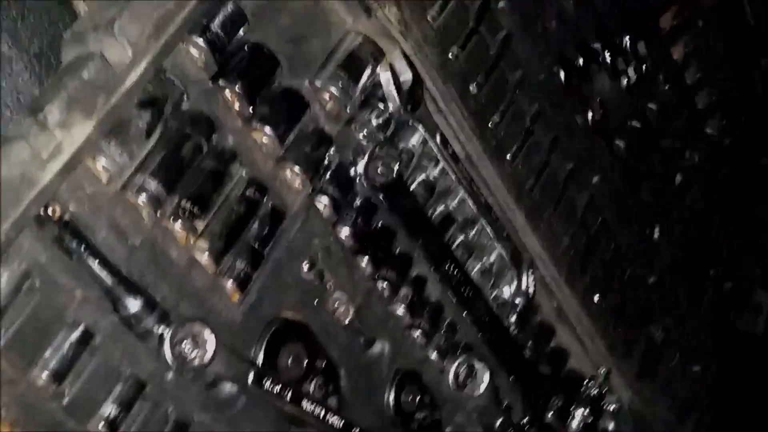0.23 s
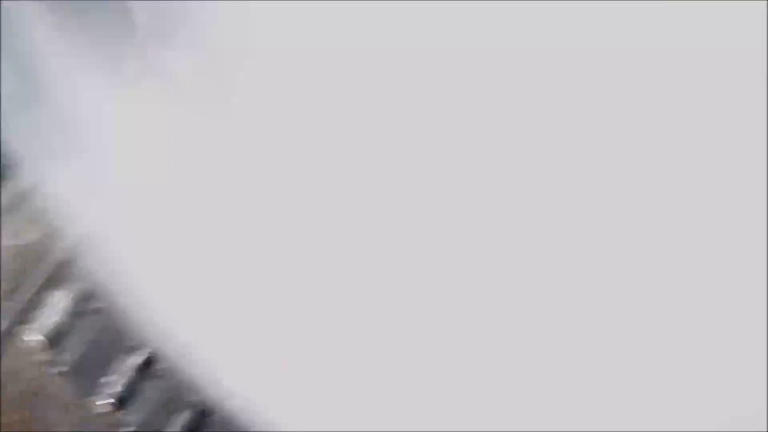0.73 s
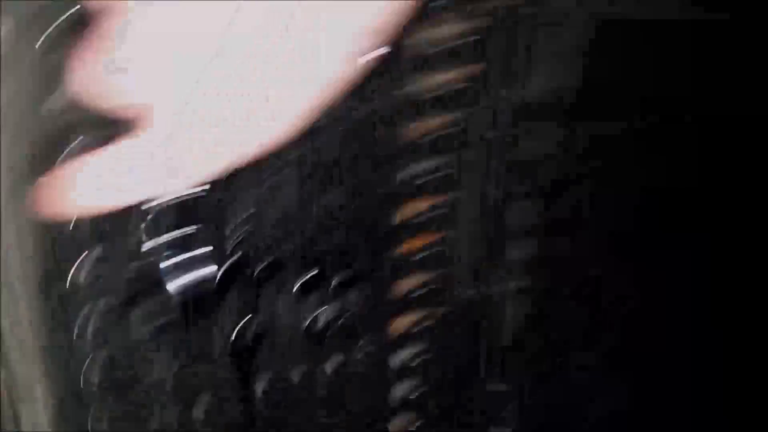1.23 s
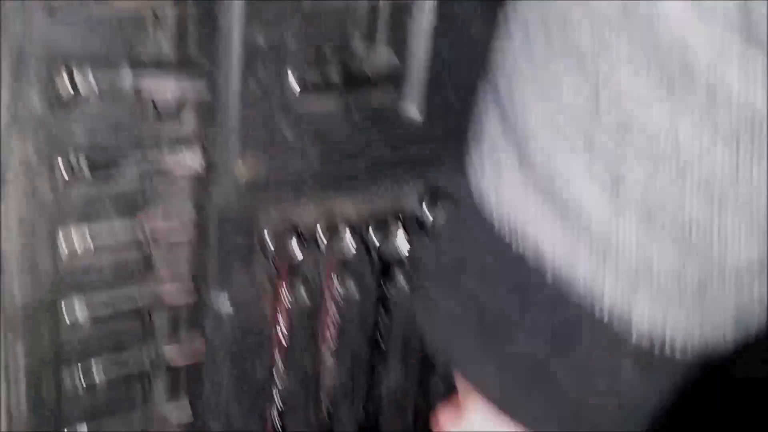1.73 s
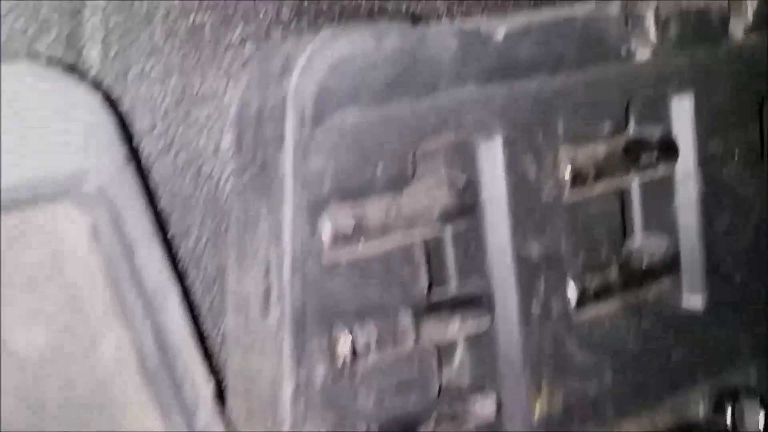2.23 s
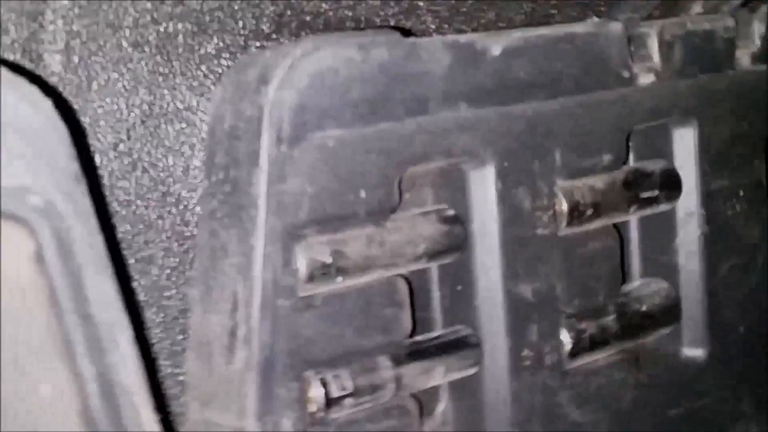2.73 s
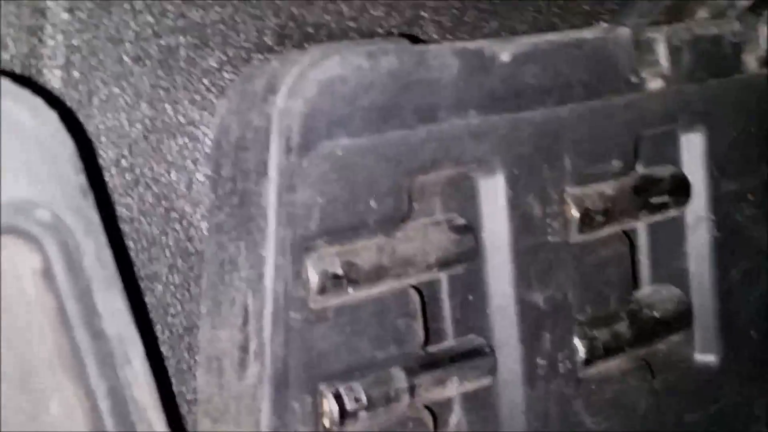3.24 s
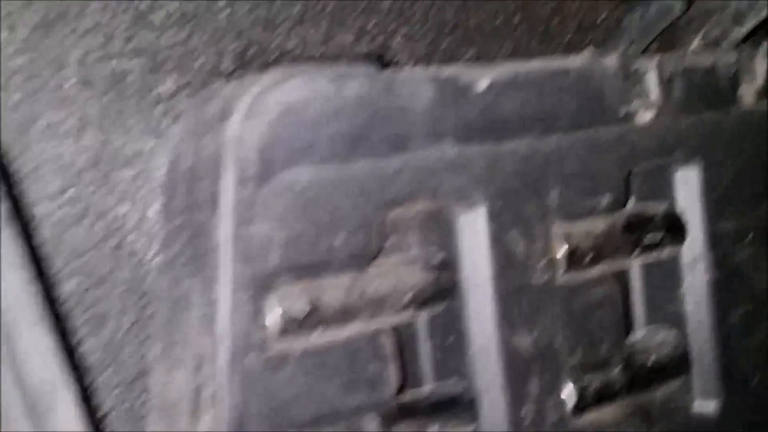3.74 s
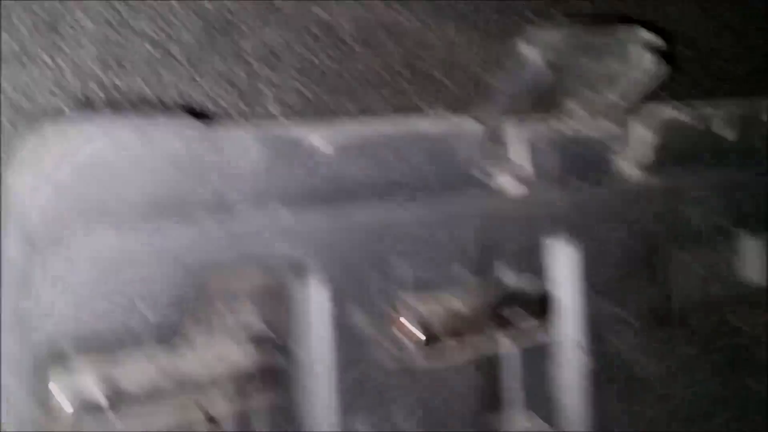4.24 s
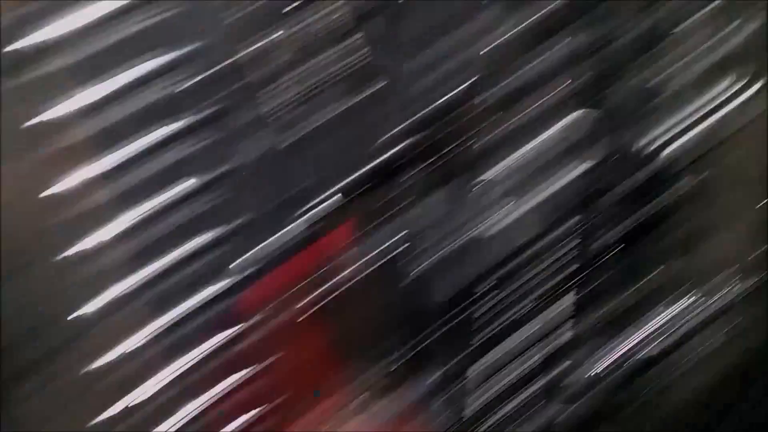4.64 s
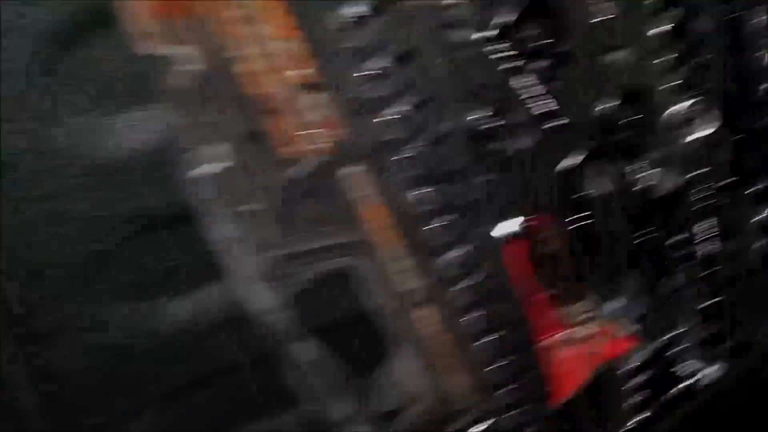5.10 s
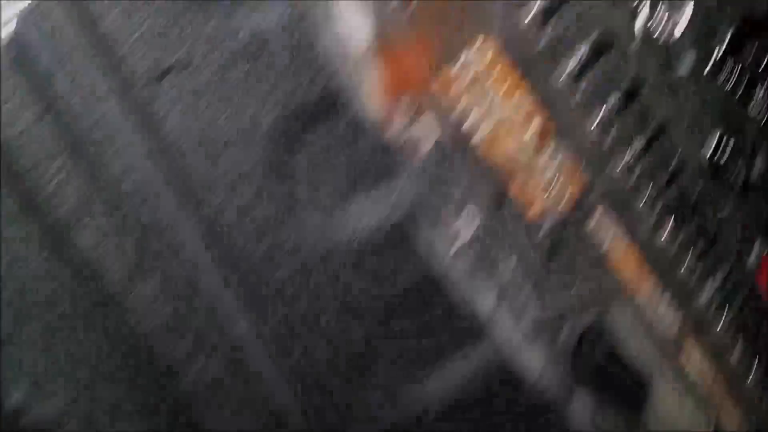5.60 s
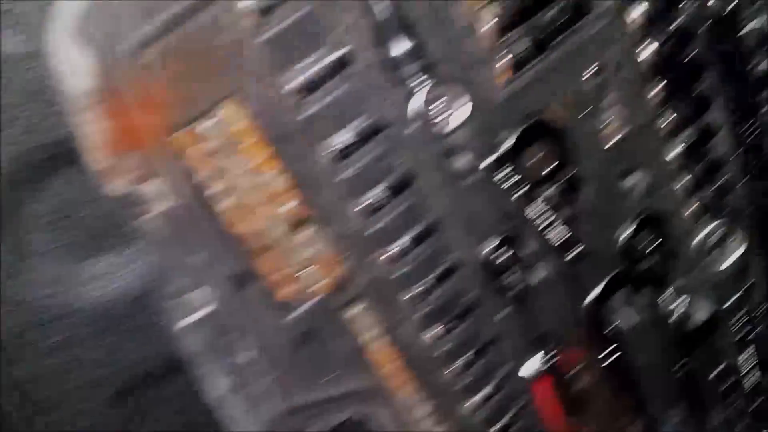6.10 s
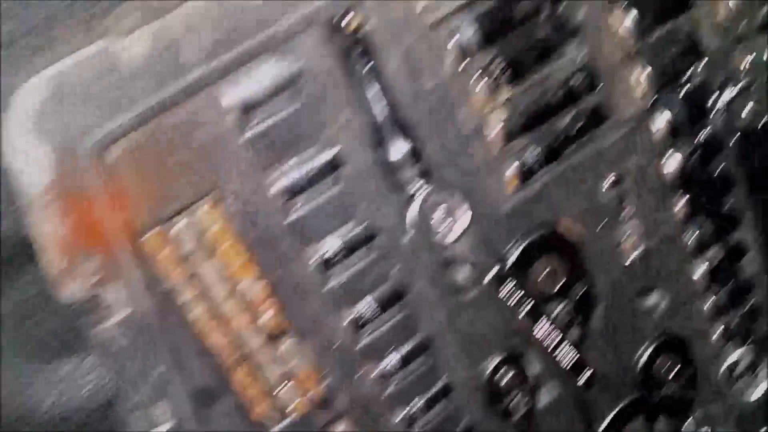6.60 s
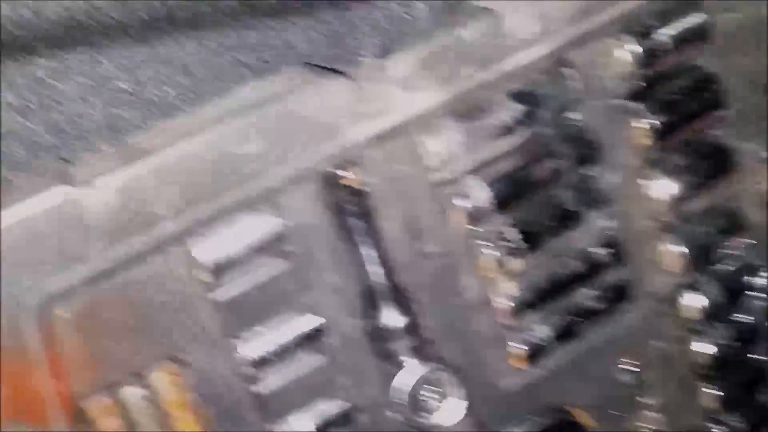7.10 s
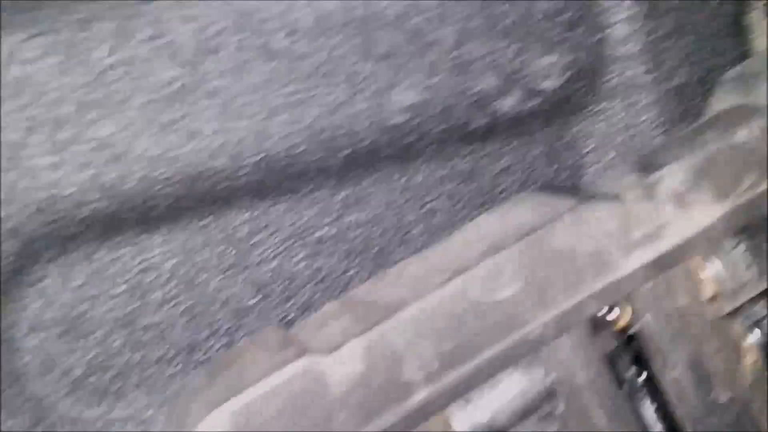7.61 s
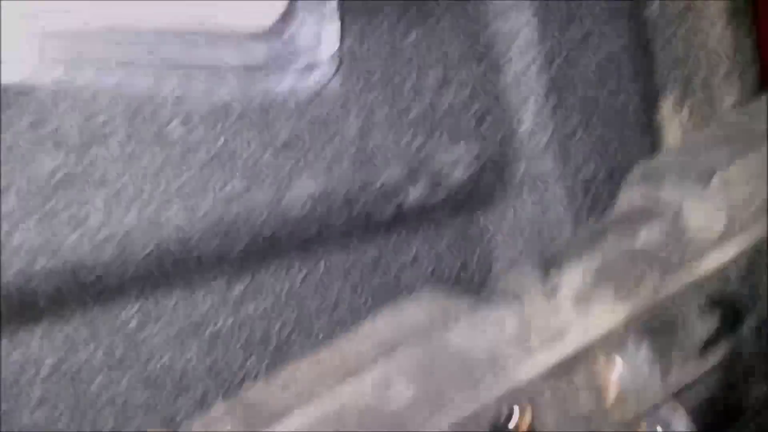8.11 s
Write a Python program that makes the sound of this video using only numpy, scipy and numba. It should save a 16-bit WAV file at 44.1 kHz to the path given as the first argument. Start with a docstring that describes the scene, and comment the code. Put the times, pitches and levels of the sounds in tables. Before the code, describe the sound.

A plastic tool case holding steel sockets is handled close to the microphone in a garage, with a short echo and a faint distant rumble. After a nearly quiet start, hollow knocks and socket rattles begin at 1.4 seconds, loudest around 1.9 and 2. From about 2.5 to 4.5 seconds the case drags over the floor in uneven shoves, a low, rough scrape with small bumps and chatter; faint plastic squeaks sound until 3 seconds. A loud, sharp knock rattles the sockets at 4.5. Quieter shifting follows, with a single thud at 5.8. Two knocks near 6.8 lead to a heavy thump and metal clink at 7, then a smaller bump. Around 7.9 come several quick knocks, bright clinks and a short scrape that fades away. A faint hiss swells after the louder sounds.

```python
"""A garage, a handheld phone close to a moulded plastic tool case full of steel sockets.
The case is tipped, dragged and dropped: blows and stick-slip on the floor ring its hollow shell,
the loose sockets chatter and clink, and plastic squeaks on plastic. Behind it are a low distant rumble
and a short tail off the walls. The phone's noise gate lets its hiss through only after loud sound."""
import sys
import numpy as np
from scipy import signal
from scipy.fft import rfft, irfft
from scipy.io import wavfile
from scipy.ndimage import uniform_filter1d
from numba import njit

SR = 44100
rng = np.random.default_rng(int(sys.argv[2]) if len(sys.argv) > 2 else 0)


def generate_wav(signal):
    """Clip the signal to [-1, 1] and save it as 16-bit WAV at the path in sys.argv[1]."""
    frames = np.transpose(np.atleast_2d(signal))
    scaled = np.clip(frames, -1, 1) * 32767
    pcm = np.round(scaled).astype(np.int16)
    wavfile.write(sys.argv[1], SR, pcm)


N = 368235
T = np.arange(N) / SR

# Distant rumble and air: (frequency [Hz], relative density [dB])
AMBIENCE_SPECTRUM = [(12, -29.5), (20, 2), (27, -7.5), (95, -3.5), (148, -19.5), (306, -21), (534, -25),
                     (1070, -23.5), (1540, -47.5), (5690, -46), (15500, -46.5)]
# Decay off the walls: (frequency [Hz], t60 [s])
WALL_DECAY = [(150, 0.51), (600, 0.16), (2000, 0.093), (6000, 0.12)]
# Microphone hiss: (frequency [Hz], relative density [dB])
HISS_SPECTRUM = [(800, -27), (3000, -9.5), (5000, -15), (9000, -17), (12000, -5.5), (14500, 0.5),
                 (16000, -7)]
# Plastic rubbing plastic: (start [s], length [s], first pitch [Hz], last pitch [Hz], blur [Hz],
# level [dB], octave above it, relative level [dB])
SQUEAK_GLIDES = [(1.045, 0.41, 2592, 2540, 250, -86.5, -34), (1.444, .8, 2630, 2556, 250, -68.5, -28),
                 (2.426, 0.095, 2550, 2470, 156, -67, -4), (2.549, 0.026, 2110, 2710, 38.6, -64, 13.5),
                 (2.676, 0.022, 2280, 2580, 40.6, -64, 16), (2.69, .09, 2560, 2450, 220, -58.5, -7),
                 (2.829, 0.071, 2500, 2450, 217, -59, -9), (2.921, 0.12, 2460, 2290, 200, -63, -4),
                 (2.581, .3, 3480, 2745, 906, -62.5, -29), (7.592, 0.29, 3890, 3850, 160, -75.5, -38)]
# The case shifting in the hands throughout: (time [s], rumble [dB], brightness [dB])
HAND_SHIFTS = [(0.0, -95.5, 0), (0.3, -82, 8), (0.68, -76.5, 8), (1.09, -79, 7.5), (1.38, -80.5, 16),
               (1.6, -59, 5.5), (2.42, -70.5, 10), (3.4, -56, 5), (4.5, -54, -3), (4.9, -68.5, 5.5),
               (5.25, -72.5, 0), (5.7, -72.5, -3.5), (6.22, -78, 6), (6.6, -82, 4.5), (7.0, -59, 5),
               (7.6, -72.5, 7.5), (8.18, -62, 2.5), (8.35, -58.5, -5.5)]
# Shoves along the floor: (peak time [s], rumble [dB], 20 dB rise [s], 20 dB fall [s], brightness [dB])
FLOOR_SHOVES = [(1.62, -61.5, 0.33, 0.19, 5.5), (2.1, -55, 0.06, 0.094, -4),
                (2.3, -51.5, 0.05, 0.092, -1.5), (2.618, -36, 0.13, 0.13, 3.5), (2.83, -45, 0.42, .28, 2),
                (3.18, -33.5, 0.078, 0.14, 3), (3.31, -43.5, 0.058, 0.27, -5),
                (3.57, -48, 0.6, 0.071, -1.5), (3.81, -34.5, 0.11, 0.16, -2),
                (4.0, -45.5, 0.067, 0.42, -1.5), (4.428, -36, 0.17, 0.074, -2),
                (4.721, -52, 0.3, 0.24, 6.5), (5.95, -67.5, 0.19, 0.32, 7.5), (6.76, -51.5, 0.03, .1, 14.5),
                (6.902, -46, 0.13, .12, -1.5), (7.94, -41.5, 0.092, .3, -1.5)]
# Rasp of dragging: (frequency [Hz], gain [dB])
RASP_SPECTRUM = [(700, -10), (1300, -5), (2200, -4.5), (3400, -4.5), (4300, 0.9), (5500, -19),
                 (8000, -10.5), (15000, 0)]
# Steel striking steel: (time [s], level [dB], extra gain from 10 kHz up [dB], left minus right [dB])
STEEL_CLINKS = [(1.461, -65, -15, 3.5), (1.787, -72, -8, 1.5), (1.811, -66, -9, 5.5), (1.862, -52, -5, 5.5),
                (2.649, -60, -3, 4), (3.081, -54.5, -6.5, 8.5), (6.792, -57, -12.5, 4.5),
                (7.026, -37.5, -25, 0.5), (7.248, -57, -22, 6), (7.881, -39, -4, 2), (7.914, -43, -7, 3),
                (7.934, -45, 1, -1)]
# Colour of a clink: (frequency [Hz], gain [dB])
CLINK_SPECTRUM = [(2000, -20.5), (3100, -3), (4500, -6.5), (6200, -10), (7800, 3.75)]
# Sockets chattering in their seats: (frequency [Hz], gain [dB], t60 [s])
SOCKET_BANDS = [(705, -5, 0.16), (1200, -11.5, 0.24), (2460, -5, 0.12), (3550, -2, 0.075), (5830, -6, 0.09),
                (7700, -8, 0.068), (10860, -13.5, 0.037), (14900, -1, .035)]
# Blows on the case: (time [s], thud [dB], boom [dB], knock [dB], crack [dB], left minus right [dB],
# low favoured pitch [Hz], high favoured pitch [Hz]); boom, knock and crack are relative to the thud
CASE_BLOWS = [(0.781, -65.5, 8.5, -6, -47, 2, 134, 774), (0.807, -78, 18, -9, -30, -6, 128, 690),
              (1.434, -29.5, -12, -12, -13.5, 3, 244, 1600),
              (1.459, -33.5, -6.5, -12.5, -15.5, 3.5, 246, 1010),
              (1.717, -34, -3.5, -8.5, -21.5, 7, 242, 1740), (1.782, -35, -7, -3, -15.5, 4, 227, 1250),
              (1.809, -32, -2, -2.5, -12.5, 5.5, 242, 1410),
              (1.856, -14.5, -24.5, -16, -22, 5.5, 329, 1370),
              (2.027, -20.5, -18.5, -28, -36.5, 4.5, 240, 480), (2.137, -44, -17, -1.5, -23, 4, 240, 726),
              (2.246, -66, 4, -32, -38, -3, 193, 886), (2.653, -41, 7, -23, -8, -1, 194, 1040),
              (3.068, -35.5, 1, -18, -24.5, 13, 295, 750), (3.079, -34, 1.5, -5.5, -15, 2, 304, 2400),
              (3.301, -40, 4, -14, -20, -0.5, 247, 1810), (3.781, -43, 5, -9, -14, -2, 176, 1030),
              (3.967, -45, 10, -11, -19, -0.5, 133, 1400), (4.286, -32.5, -10, -52, -53, 11, 231, 550),
              (4.543, -15.5, -17.5, -20.5, -9.5, 5, 261, 1350),
              (4.883, -50, -14.5, -21, -34, 5.5, 314, 618), (5.085, -55.5, 4, -23, -35, 5.5, 174.5, 643),
              (5.579, -63, 5, -23, -32, 7.5, 163.6, 646), (5.784, -28, -6, -26.5, -34.5, 5.5, 329, 405),
              (6.729, -34, -15, -15, -12, 4, 305.4, 638), (6.789, -30, -9.5, -12, -10, 4.5, 310, 537),
              (6.912, -43, -18, -25, -48, 7, 304, 950), (7.023, -15, -12, -13, -22.5, 4.5, 306, 1360),
              (7.247, -30, 3, -19.5, -29, 5.5, 292, 1010), (7.749, -30, 3, -29.5, -55, 7, 300, 456),
              (7.763, -45.5, 2, -26, -14, 5, 204, 579), (7.808, -39, 8.5, -39, -54, 3, 179.5, 565),
              (7.88, -34.5, -6, -1.5, -17.5, 3.5, 322, 1180),
              (7.912, -40.5, -10.5, -9, -3.5, 1.5, 270, 662), (7.934, -39, -18, -14.5, -29, 6, 325, 696)]
# Where a blow's boom, thud, slap, knock, crack, tick and top lie: (frequency [Hz])
BLOW_BANDS_HZ = [140, 280, 600, 1300, 3000, 9000, 16000]
# Modes of the hollow case and, above 2 kHz, the steel in it: (frequency [Hz], gain [dB], t60 [s])
CASE_MODES = [(56.07, -2, 0.15), (91.3, 3.5, 0.13), (132.4, 4, 0.091), (156.1, 3.5, 0.2), (173.1, 2, 0.39),
              (194, 0.5, 0.24), (228.8, 0, 0.31), (243.5, 3, 0.12), (266, 1.5, 0.15), (306.2, 2.5, 0.14),
              (324.4, -0.5, 0.076), (373.7, -1, .16), (426, -2.5, 0.16), (467, 0, 0.25), (502, -5.5, 0.13),
              (600.3, -6, 0.22), (697, -1, 0.024), (752, -6.5, 0.19), (873, 0, 0.063), (964.6, 2, 0.098),
              (1031, 2, 0.13), (1238, 1, 0.019), (1325, 3.5, 0.11), (1355, 1.5, 0.12), (1702, 4, 0.089),
              (1843, -0.5, 0.092), (1915, -11.5, 0.19), (2290, -7, 0.053), (3030, -6.5, 0.044),
              (3605, 3, .05), (5680, -6, 0.06), (7240, -2.5, 0.04), (7900, -0.5, .025)]

DRAG_PAN_DB = np.array([[2.0], [-2.5]])  # left, right
LN_1000 = np.log(1000)  # a 60 dB decay in nepers


def undb(db):
    return 10 ** (np.asarray(db) / 20)


def level(x, db):
    return x * undb(db) / np.sqrt(np.mean(np.abs(x) ** 2))


def log_interp(hz, points_hz, values):
    return np.interp(np.log(hz), np.log(points_hz), values)


def at(table, hz, column=1):
    """Value of a table on a log-frequency axis."""
    columns = np.transpose(table)
    return log_interp(hz, columns[0], columns[column])


def ring(x, t60, hz=0.):
    """One ringing pole; at 0 Hz a plain decay."""
    return signal.lfilter([1], [1, -np.exp((2j * np.pi * hz - LN_1000 / t60) / SR)], x)


def band(x, hz, width):
    edges = np.clip([hz - width / 2, hz + width / 2], 10, .47 * SR)
    return signal.sosfilt(signal.butter(2, edges, "band", fs=SR, output="sos"), x)


def coloured_noise(spectrum):
    """Two unrelated noises with the given spectrum."""
    hz = np.maximum(np.fft.rfftfreq(N, 1 / SR), 1)
    return irfft(rfft(rng.standard_normal((2, N))) * undb(at(spectrum, hz)), N)


def mic_pair(a, b, alike=0.32):
    """Two random signals made partly alike for the two microphones."""
    return np.array([a, alike * a + np.sqrt(1 - alike ** 2) * b])


def random_hits(per_second, spread_db):
    """Impulses of uneven strength at random times."""
    hit = rng.random(N) < per_second / SR
    return hit * undb(spread_db * rng.exponential(size=N))


def garage_ambience(level_db=-71):
    """Low rumble and air, far off; the bass is the same at both microphones."""
    noise = coloured_noise(AMBIENCE_SPECTRUM)
    bass = signal.sosfilt(signal.butter(1, 170, fs=SR, output="sos"), noise)
    return level(noise - bass + bass[0], level_db)


def wall_reverb(near, level_db=-14.5, onset_s=0.0053):
    """The walls answer with a short tail that loses its treble first."""
    t, tail = T[:SR], 0
    for hz in 100 * 2 ** np.arange(8):
        decay = undb(-60 * t / at(WALL_DECAY, hz))
        tail += band(rng.standard_normal((2, SR)), hz, .7 * hz) * decay
    tail *= np.clip(t / onset_s, 0, 1)
    tail *= undb(level_db) / np.sqrt(np.sum(tail ** 2) / 2)
    return signal.fftconvolve(near, tail, axes=1)[:, :N]


def plastic_squeaks(pure_tone=0.37):
    """Plastic rubs on plastic: gliding tones blurred by uneven slipping, some with their octave."""
    out = np.zeros(N)
    for start, length, first_hz, last_hz, blur_hz, db, octave_db in SQUEAK_GLIDES:
        envelope = np.interp(T, start + length * np.array([0, 0.11, 0.73, 1]), [0, 1, 1, 0.00058])
        pitch_hz = np.interp(T, [start, start + length], [first_hz, last_hz])
        phase = 2 * np.pi * np.cumsum(pitch_hz) / SR
        blur = level(uniform_filter1d(rng.standard_normal((2, N)), int(SR / blur_hz)), 0)
        tone = (pure_tone + (blur[0] + 1j * blur[1]) / 2) * np.exp(1j * phase)
        out += undb(db) * envelope * (tone + undb(octave_db) * tone ** 2).imag
    return out


def stick_slip(smear_s=.02):
    """The ribbed underside catches and slips: a rough strength curve of rms 1."""
    slips = random_hits(per_second=1500, spread_db=2.5)
    return level(uniform_filter1d(slips, int(smear_s * SR)), 0)


def drag_strength(hz, rasp_db=-19, grit_db=-24.5, dust_db=-57.5):
    """Handling, shoves and settling at one frequency; bright movements have more rasp and grit."""
    t = T[::128]
    colour_db = log_interp(hz, [250, 1300, 3200, 16000], [0, rasp_db, grit_db, dust_db])
    bright_share = log_interp(hz, [250, 1300, 3200], [0, 1, 0.99])
    # The case rocks on after each blow, like a faint shove.
    settling = [(time + 0.027, thud_db - 29.5, 0.027, 0.49, 1.75) for time, thud_db, *_ in CASE_BLOWS]
    peak, db, rise, fall, bright_db = np.transpose(FLOOR_SHOVES + settling)[:, :, None]
    below_peak_db = 20 * np.maximum((peak - t) / rise, (t - peak) / fall)
    moves = undb(db + bright_share * bright_db - below_peak_db)
    times, db, bright_db = np.transpose(HAND_SHIFTS)
    handling = undb(np.interp(t, times, db + bright_share * bright_db))
    power = handling ** 2 + np.sum(moves ** 2, axis=0)
    return np.interp(T, t, np.sqrt(power)) * undb(colour_db)


def impact_strength(hz, favour_db=8, favour_width=.09):
    """Every blow, then every clink, at one frequency, left and right; favoured pitches ring louder."""
    _, thud, boom, knock, crack, blow_pan, *favoured_hz = np.transpose(CASE_BLOWS)
    slap, tick, top = 0.47 * knock - 4.5, crack - 29, crack - 42
    spectra = np.transpose([boom, np.zeros_like(thud), slap, knock, crack, tick, top])
    blow_db = thud + [log_interp(hz, BLOW_BANDS_HZ, spectrum) for spectrum in spectra]
    detuning = np.log(hz / np.array(favoured_hz)) / favour_width
    blow_db += favour_db * np.exp(-detuning ** 2).sum(axis=0)
    _, clink_db, treble_db, clink_pan = np.transpose(STEEL_CLINKS)
    clink_db = clink_db + at(CLINK_SPECTRUM, hz) + treble_db * np.interp(hz, [8000, 10000], [0, 1])
    db, pan = np.r_[blow_db, clink_db], np.r_[blow_pan, clink_pan]
    return undb(db + np.array([pan, -pan]) / 2)


def socket_rebounds(steady=0.89):
    """Sockets rebound at random: a spiky strength curve of rms 1."""
    spikes = ring(random_hits(per_second=220, spread_db=-0.5), t60=0.075).real
    return level(steady + level(spikes, 0), 0)


def socket_chatter(impact_samples, slips):
    """Sockets knock in their seats: a crack, then rebounds that die faster in the treble; drags rasp."""
    out, rebounds = 0, socket_rebounds()
    for hz in 600 * 2 ** np.linspace(0, 4.65, num=13):
        impacts = np.zeros((2, N))
        impacts[:, impact_samples] = impact_strength(hz)
        t60, rise_s = at(SOCKET_BANDS, hz, column=2), 0.0036 + 24 / hz
        crack = undb(-2) * ring(impacts, 0.22 * t60).real
        rattle = undb(-5.5) * rebounds * ring(impacts, t60).real
        chatter = ring(crack + rattle, rise_s).real * LN_1000 / (rise_s * SR)  # rounds the attack
        rasp = undb(at(RASP_SPECTRUM, hz) + DRAG_PAN_DB) * slips * drag_strength(hz)
        noise = level(band(mic_pair(*rng.standard_normal((2, N))), hz, 0.28 * hz), 0)
        out += noise * (undb(at(SOCKET_BANDS, hz)) * chatter + rasp)
    return out


def hollow_case(impact_samples, slips, push_cycles=2.2, scatter_db=2):
    """Each mode swells over the push of a blow, then rings out; dragging shakes it at random."""
    out = 0
    for hz, db, t60 in CASE_MODES:
        chance = rng.standard_normal((len(impact_samples), 3)).T
        phase = np.angle(mic_pair(*np.exp(10j * chance[:2])))
        scatter = undb(scatter_db * chance[2])
        impacts = np.zeros((2, N), complex)
        impacts[:, impact_samples] = impact_strength(hz) * np.exp(1j * phase) * scatter
        push_t60 = min(LN_1000 * push_cycles / hz, .8 * t60)
        push = ring(impacts, push_t60, hz) * LN_1000 / (push_t60 * SR)
        shake = mic_pair(*rng.standard_normal((2, N))) * slips * drag_strength(hz)
        shake *= np.sqrt(2 * LN_1000 / (t60 * SR))  # same power however long the mode rings
        drive = undb(-7.5) * push + undb(-8.5 + DRAG_PAN_DB) * shake
        out += undb(db) * ring(drive, t60, hz).imag
    return out


def scene(right_lag_samples=14):
    """The case close to the phone, with the walls and the distant rumble behind it."""
    impact_samples = np.array([int(time * SR) for time, *_ in CASE_BLOWS + STEEL_CLINKS])
    slips = stick_slip()
    near = hollow_case(impact_samples, slips) + socket_chatter(impact_samples, slips) + plastic_squeaks()
    # A small case radiates no deep bass.
    near = signal.sosfilt(signal.butter(2, 45, "high", fs=SR, output="sos"), near)
    near[1] = np.roll(near[1], right_lag_samples)  # the right microphone is further from the case
    return near + wall_reverb(near) + garage_ambience()


@njit
def follow(x, rise_s, fall_s):
    """Envelope with separate rise and fall times."""
    out, envelope = np.empty(len(x)), 0.
    for i in range(len(x)):
        envelope += (x[i] - envelope) / (SR * (rise_s if x[i] > envelope else fall_s))
        out[i] = envelope
    return out


def record(dry, threshold_db=-59, span_db=16.5, hiss_db=-75, shut_db=-26, top_hz=15800):
    """The phone's gate opens slowly on loud sound and lets microphone hiss through; the top is cut."""
    loudness_db = 10 * np.log10(uniform_filter1d(np.mean(dry ** 2, axis=0), 1024) + 1e-12)
    gate_target = np.clip((loudness_db - threshold_db) / span_db, 0, 1)
    gate = follow(gate_target, rise_s=0.17, fall_s=0.22)
    hiss = level(coloured_noise(HISS_SPECTRUM), hiss_db) * undb(shut_db * (1 - gate))
    return signal.sosfilt(signal.ellip(10, .2, 60, top_hz, fs=SR, output="sos"), dry + hiss)


dry = scene()
out = record(dry)
generate_wav(out)
```